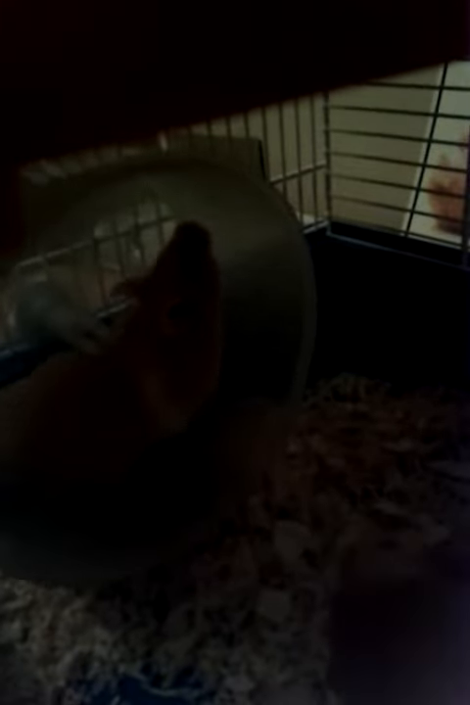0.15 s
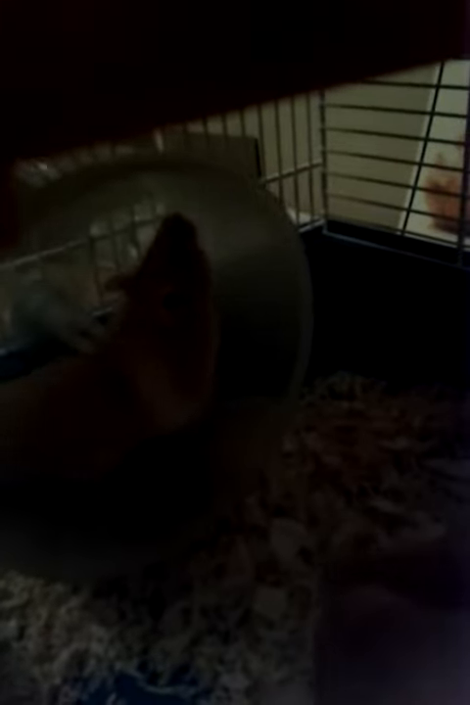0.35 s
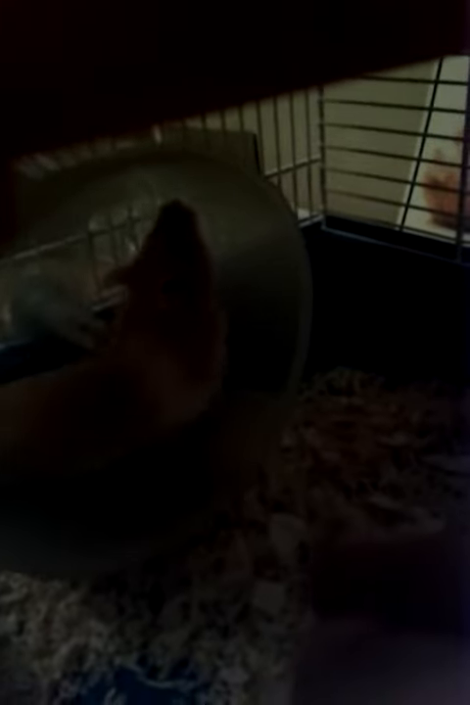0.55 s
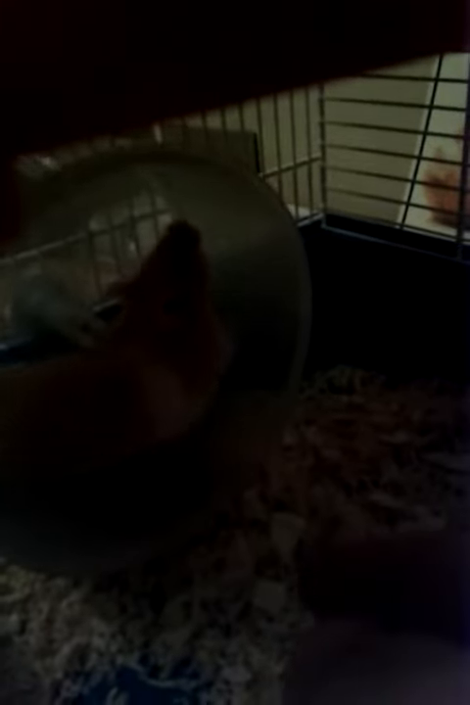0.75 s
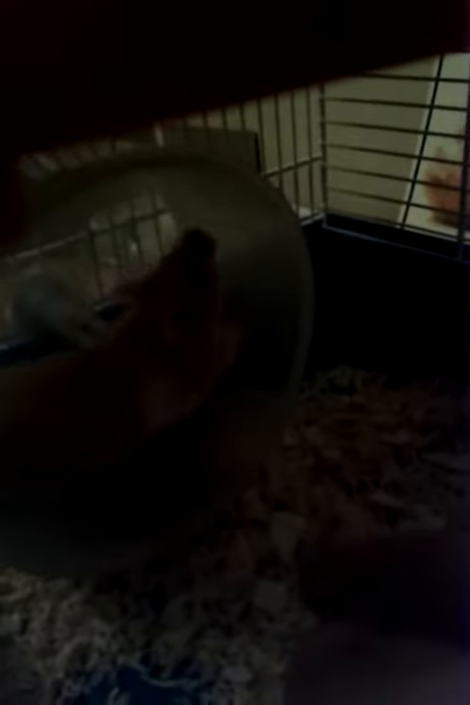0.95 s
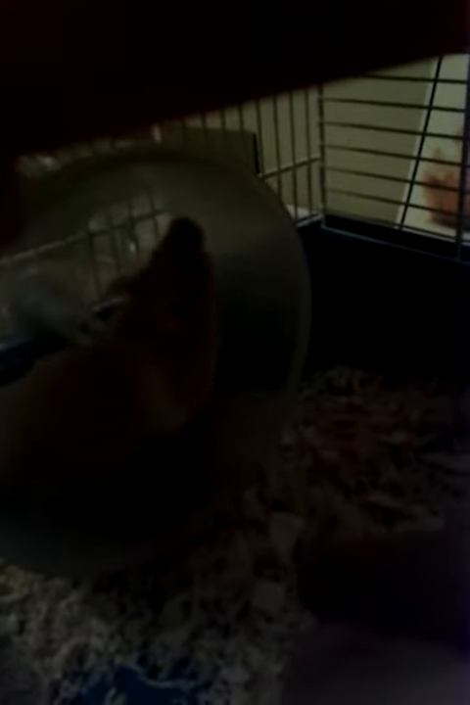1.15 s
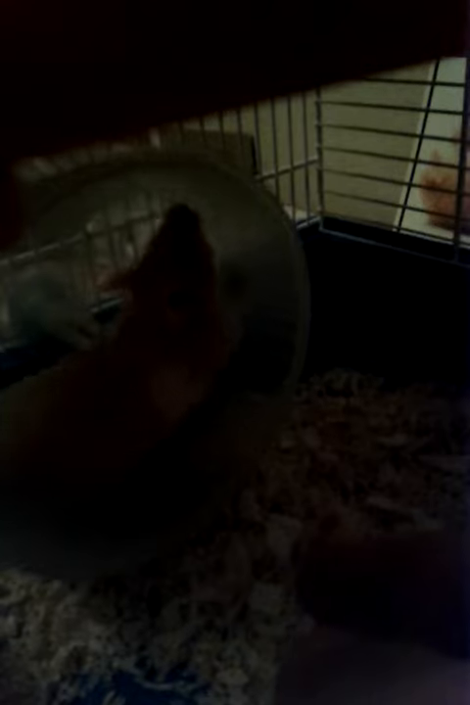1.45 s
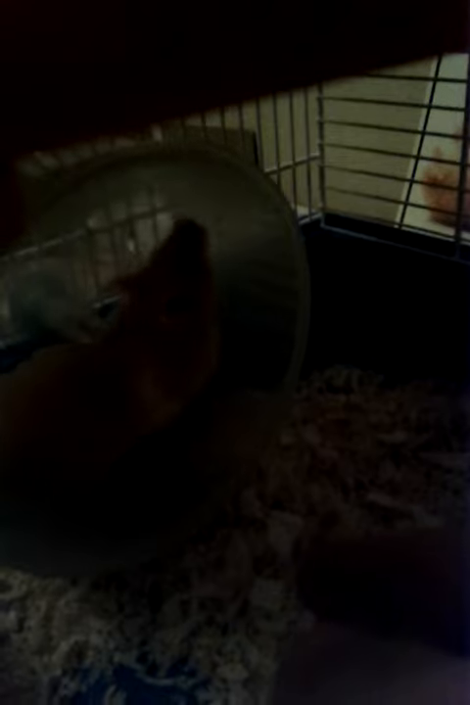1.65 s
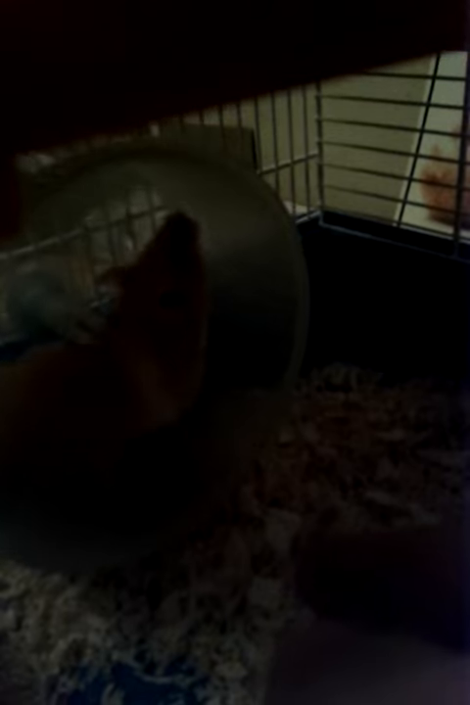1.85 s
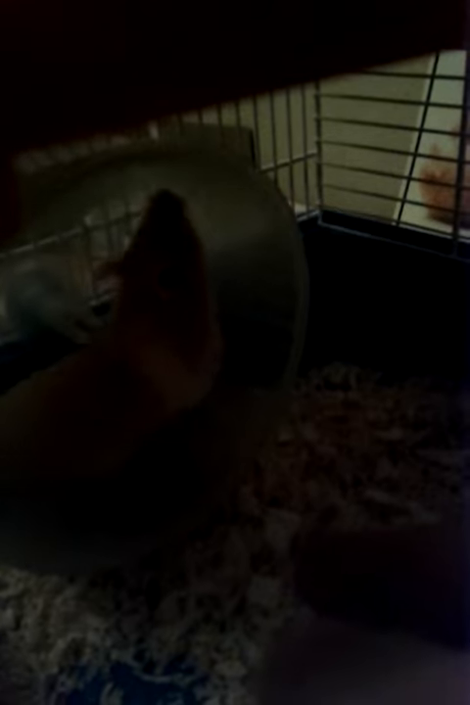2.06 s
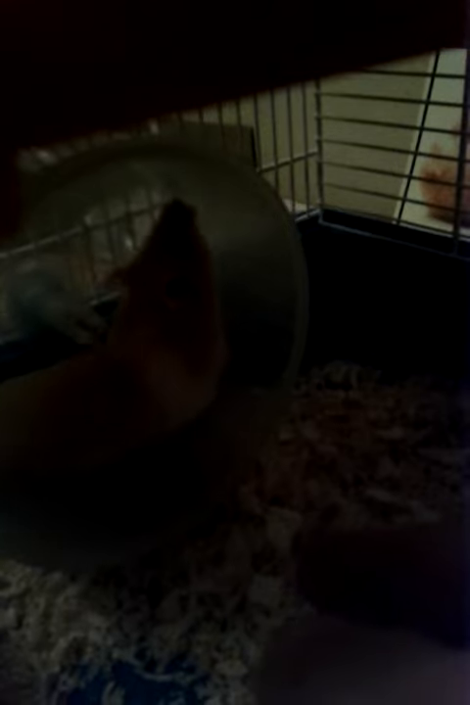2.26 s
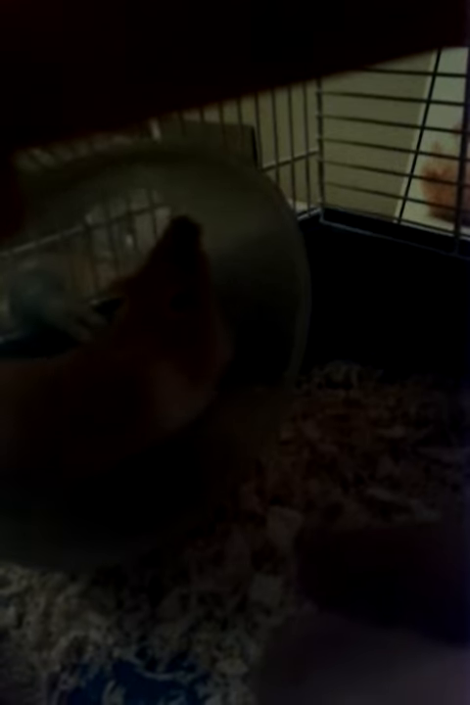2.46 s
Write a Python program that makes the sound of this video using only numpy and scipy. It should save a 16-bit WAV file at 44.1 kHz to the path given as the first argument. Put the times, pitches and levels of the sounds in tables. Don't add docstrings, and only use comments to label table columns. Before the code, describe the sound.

Close, narrow-band phone pickup of a rodent's wheel rattling in a wire cage: soft pats and ticks first, sharp knocks in the middle, a thin brief squeak, then the strongest clatter near the end.

```python
import sys
import numpy as np
from scipy import signal
from scipy.fft import rfft, irfft
from scipy.io import wavfile
from scipy.ndimage import uniform_filter1d, minimum_filter1d

SR = 44100
rng = np.random.default_rng(int(sys.argv[2]) if len(sys.argv) > 2 else 0)


def gain_from_decibels(decibels):
    exponent = np.asarray(decibels, float) / 20
    return 10 ** exponent


def generate_wav(sig):
    pcm = np.round(np.clip(np.atleast_2d(sig).T, -1, 1) * 32767).astype(np.int16)
    wavfile.write(sys.argv[1], SR, pcm)


N = 114660


def level(x, db):
    return x * gain_from_decibels(db) / np.sqrt(np.mean(x ** 2))


def colour(x, points):
    p = np.array(points)
    hz = np.maximum(np.fft.rfftfreq(len(x), 1 / SR), 1)
    gain_db = np.interp(np.log(hz), np.log(p[:, 0]), p[:, 1])
    return irfft(rfft(x) * gain_from_decibels(gain_db), len(x))


def ring(x, hz, t60_s):
    r = np.exp(-np.log(1000) / (t60_s * SR))
    w = 2 * np.pi * hz / SR
    return signal.lfilter([0, r * np.sin(w)], [1, -2 * r * np.cos(w), r * r], x)


def soften(x, hz, kind="low"):
    return signal.lfilter(*signal.butter(2, hz, kind, fs=SR), x)


def walk(rate_hz):
    k = int(SR / rate_hz)
    steps = np.repeat(rng.standard_normal(N // k + 1), k)
    return 1.5 * uniform_filter1d(uniform_filter1d(steps, k), k)[:N]


def grains(size, per_s):
    chance, strength = rng.random((2, size))
    return (chance < per_s / SR) * (2 * strength - 1)


def add(out, x, s, db):
    i = int(s * SR)
    out[i:i + len(x)] += (x * gain_from_decibels(db) / np.max(np.abs(x)))[:N - i]


# [f/Hz, density/dB per Hz]
ROOM = [(15, -68), (25, -25.5), (76, 4), (404, -20.5), (1140, -15.5), (1660, 0), (1870, -20.5),
        (2860, -11.5), (7000, -15), (9100, -65.5), (15400, -120)]
# [f/Hz, width/Hz, level/dB]
HUMS = [(1483, 74, -58), (1664, 220, -56.5), (913, 120, -59), (3400, 560, -62.5), (2170, 150, -64.5)]


def room():
    out = level(colour(rng.standard_normal(N), ROOM), -55)
    for hz, width_hz, db in HUMS:
        hum = ring(rng.standard_normal(N), hz, 2.22 / width_hz)
        out += level(hum, db) * gain_from_decibels(2.3 * walk(12.2))
    return out


# [t/s, f/Hz, level/dB]
SQUEAK = [
    (1.4, 6250, -69),
    (1.452, 5775, -65),
    (1.545, 5790, -66),
    (1.57, 5830, -74),
]


def squeak():
    t, (at_s, hz, db) = np.arange(N) / SR, np.transpose(SQUEAK)
    loud_db = np.interp(t, at_s, db, -120, -120) + 3 + 1.5 * walk(60)
    phase = 2 * np.pi * np.cumsum(np.interp(t, at_s, hz)) / SR
    return uniform_filter1d(gain_from_decibels(loud_db), 300) * np.sin(phase)


# [f/Hz, level/dB, t60/s]
WHEEL = [(181, -12.5, 0.16), (214.5, -9, 0.12), (262.4, -3, 0.091), (326.8, -6, 0.13), (401, -8, 0.21),
         (421.4, -2, 0.11), (556.4, -7, 0.12), (631.4, -8.5, 0.086), (778, -12, 0.044),
         (902.3, -10.5, 0.14), (1120, -12, 0.023), (1461, -9, 0.078), (1662, -8.5, 0.024),
         (2006, -26.5, 0.25)]


def wheel(push, bass_db, spot_db, detune, flip_every):
    out = np.zeros(len(push))
    for k, (hz, db, t60_s) in enumerate(WHEEL):
        mode_db = db + spot_db[k] + bass_db * (hz < 350)
        out += gain_from_decibels(mode_db) * (-1) ** (k // flip_every) * ring(push, hz * (1 + detune[k]), t60_s)
    return out


# [t/s, level/dB]
ROCKING = [(0, -48.5), (.35, -49.5), (.55, -48), (.8, -44), (.95, -45.5), (1.06, -37.5), (1.2, -43),
           (1.33, -39.5), (1.45, -44), (1.9, -49.5), (2.1, -41), (2.22, -44.5), (2.6, -49.5)]


def rocking():
    push = soften(grains(N, 540) * gain_from_decibels(2.9 * walk(29.98)), 720)
    still = np.zeros(len(WHEEL))
    body = wheel(push, 1.1, still, still, flip_every=1)
    bits = grains(N, 210) ** 3
    grit = 0.42 * ring(bits, 1500, 0.0098) + ring(bits, 4400, 0.0078)
    grit += 0.76 * ring(bits, 3300, 0.0058) + 0.68 * ring(bits, 5000, 0.0091)
    at_s, db = np.transpose(ROCKING)
    return (level(body, 0) + level(grit, -26.5)) * gain_from_decibels(np.interp(np.arange(N) / SR, at_s, db))


# [t/s, level/dB, f/Hz, scratch length/s]
TICKS = [(0.1096, -34, 2140, 0.0026), (0.1226, -40.5, 2040, 0.0018), (0.1855, -33.5, 3300, 0.0034),
         (0.2234, -28.5, 3760, 0.0025), (0.2653, -34.5, 2290, 0.0029), (0.3506, -37.5, 3210, 0.0051),
         (0.4155, -26, 6740, 0.0038), (0.4195, -34.5, 4000, 0.0017), (0.4688, -34.5, 3520, 0.0055),
         (0.5048, -35.5, 5500, 0.0025), (0.5841, -33.5, 2330, 0.0013), (0.7297, -34.5, 3070, 0.0015),
         (0.7567, -48, 2270, 0.002), (0.8185, -29, 2270, 0.0014), (0.8979, -36.5, 3400, 0.0018),
         (0.9098, -32.5, 3580, 0.0018), (0.9248, -31.5, 2370, 0.0015), (0.9502, -34.5, 3440, 0.002),
         (1.0802, -25.5, 4930, 0.0012), (1.1233, -33.5, 2960, 0.0011), (1.1902, -42, 2230, 0.0028),
         (1.2441, -45.5, 3840, 0.0049), (1.4646, -56, 2170, 0.002), (1.5504, -33, 2340, 0.002),
         (1.5783, -35.5, 3450, 0.002), (1.6591, -28.5, 2100, 0.0015), (1.6911, -26.5, 3760, 0.0024),
         (1.8203, -31.5, 3400, 0.001), (1.947, -38, 3480, 0.0032)]
# [t/s, level/dB, f/Hz, scratch length/s]
TICKS_LATE = [(0.698, -34.5, 3400, 0.0022), (1.703, -36, 3400, 0.002), (1.712, -42, 3320, 0.003),
              (1.731, -40.5, 3300, 0.002), (2.025, -43, 1700, 0.0032), (2.037, -34.5, 2080, 0.0038),
              (2.046, -28, 1510, 0.006), (2.083, -32, 2000, 0.004), (2.09, -36.5, 1580, 0.0036),
              (1.9145, -39.5, 3250, 0.0018), (2.1859, -37.5, 3220, 0.002), (2.2872, -36, 3500, 0.0015),
              (2.3316, -36, 2230, 0.0019), (2.363, -47, 2250, 0.0013), (2.4134, -32, 2150, 0.001),
              (2.5182, -35.5, 2550, 0.0037)]


def ticks():
    out, t = np.zeros(N), np.arange(SR // 25) / SR
    for s, db, hz, length_s in list(TICKS) + list(TICKS_LATE):
        length_s = max(length_s, .0004)
        fade = np.exp(-t / length_s) * np.minimum(3 * t / length_s, 1)
        scratch = soften(rng.standard_normal(len(t)), 1300, "high") * fade
        dull = soften(soften(scratch, 3.1 * hz), 1.3 * hz)
        wire = ring(scratch, hz, .007)
        add(out, level(dull, 0) + level(wire, -4), s, db - 2)
    return out


def blow(length_s, bass_db, soft_hz, first, rim_db):
    t, rattle_per_s = np.arange(SR // 5) / SR, 800
    rebound_fade = np.clip(3 - 3 * t / max(length_s, .002), 0, 1)
    push = gain_from_decibels(-11.5) * grains(len(t), rattle_per_s) * rebound_fade
    push[0] = first
    push = soften(push, soft_hz)
    scrape = grains(len(t), 4 * rattle_per_s) * np.exp(-t / max(0.46 * length_s, .002))
    scrape = soften(soften(soften(scrape, 810, "high"), 2250), 4500)

    spot = rng.standard_normal((len(WHEEL), 2))
    body = wheel(push, bass_db, 3.5 * spot[:, 0], 0.014 * spot[:, 1], flip_every=2)
    body += gain_from_decibels(-33 + bass_db) * ring(push, 95 * (1 + 0.14 * spot[0, 1]), 0.13)
    body += gain_from_decibels(rim_db) * ring(push, 427.4 * (1 + 0.014 * spot[1, 1]), 0.23)
    swell = np.minimum(0.52 + t / 0.0027, 1)
    damping_db = -16 * (1 - np.exp(-np.maximum(t - length_s, 0) / 0.0066))
    return level(body * swell * gain_from_decibels(damping_db), 0) + level(scrape, -20.5)


# [t/s, level/dB, bass/dB]
PATS_EARLY = [(0.115, -34.5, 4), (0.122, -28.5, 2.5), (0.133, -31, -13), (0.142, -36, -12),
              (0.154, -36, -15), (0.162, -37, 15.5), (0.244, -30, -3), (0.258, -36, 8), (0.267, -28.5, 1.5),
              (0.274, -30.5, 5), (0.424, -33, 0.5), (0.431, -29, -2), (0.442, -31, -4.5), (0.479, -28, -1),
              (0.487, -29, -2), (0.496, -39, -1), (0.505, -32.5, -10), (0.52, -30.5, -2.5),
              (0.527, -27.5, -2), (0.675, -23, 1), (0.704, -33.5, -9.5), (0.711, -26.5, 8),
              (0.724, -37, 13), (0.751, -33, 8.5), (0.759, -25.5, -1.5), (0.767, -27.5, -4.5),
              (0.791, -37.5, 13), (0.819, -31, -0.5), (0.836, -32.5, -1), (0.87, -29, -6),
              (0.877, -31, -2.5), (0.976, -29.5, 8.5), (0.989, -38, 8), (1.026, -20, 4.5),
              (1.043, -31.5, 0), (1.058, -32, -9.5), (1.072, -27.5, -8), (1.085, -24.5, -2.5),
              (1.092, -27.5, 3), (1.102, -36.5, 2.5), (1.125, -24.5, -8.5), (1.133, -23.5, -5),
              (1.14, -35.5, 10.5), (1.162, -32.5, 11), (1.169, -41, -3), (1.192, -31, 8), (1.206, -34.5, 0),
              (1.247, -27, -7), (1.255, -36.5, -0.5)]
# [t/s, level/dB, bass/dB]
PATS_LATE = [(1.283, -23.5, 5), (1.292, -31.5, 1), (1.299, -27.5, 7), (1.306, -32, 10), (1.318, -30.5, -5),
             (1.325, -36, 4), (1.332, -39, -5.5), (1.341, -28.5, 5), (1.36, -32, 9), (1.373, -37, 4),
             (1.384, -34, 10), (1.398, -35, 7), (1.486, -29.5, 0), (1.496, -30, -6), (1.557, -28, -7),
             (1.565, -28, 0.5), (1.588, -37.5, -4), (1.655, -28.5, 2.5), (1.663, -29, 4), (1.681, -29.5, 3),
             (1.728, -25.5, -5.5), (1.741, -27.5, 6.5), (1.75, -28.5, -4), (1.956, -38.5, 6.5),
             (1.987, -29.5, -14), (1.995, -26, -14), (2.027, -25, -2), (2.038, -17, -3),
             (2.054, -21.5, 2.5), (2.062, -28, 2), (2.083, -20.5, -4.5), (2.102, -23, 10),
             (2.147, -34.5, -1.5), (2.159, -32.5, 6), (2.172, -34.5, -1.5), (2.182, -30.5, 0.5),
             (2.19, -35, 13), (2.25, -29.5, 0.5), (2.257, -37.5, 1), (2.266, -36, 15), (2.274, -32.5, -1.5),
             (2.312, -33, -0.5), (2.343, -39, -12), (2.366, -26.5, 1), (2.373, -34, 10), (2.38, -27.5, 8.5),
             (2.391, -34.5, 1), (2.423, -26, 2), (2.43, -40.5, -6), (2.438, -30, 3), (2.463, -31, 4.5)]
# [t/s, level/dB, bass/dB]
PATS_MORE = [(.109, -33.5, -8.5), (.298, -32.5, -1), (.635, -36, 9), (1.551, -32, -8.5), (1.716, -25, 3),
             (1.791, -37.5, 7), (1.942, -36, -5), (2.09, -22.5, -9), (2.125, -22.5, -0.5), (2.305, -42, 4),
             (2.526, -37.5, -9)]


def pats():
    out = np.zeros(N)
    for s, db, bass_db in list(PATS_EARLY) + list(PATS_LATE) + list(PATS_MORE):
        add(out, blow(0.0062, bass_db, soft_hz=1130, first=.8, rim_db=-12.5), s, db + 0.97)
    return out


# [t/s, level/dB, rattle length/s, crack/dB, bass/dB]
KNOCKS = [
    (.661, -24, 0.015, -13, -2.5),
    (0.69, -24, 0.013, -11, 2.5),
    (1.011, -16.5, 0.012, 0, -17.5),
    (1.266, -20, 0.018, -1, -7.5),
    (2.011, -18, 0.016, -1.5, -1.5),
    (2.07, -15, 0.014, -5, -0.5),
    (2.117, -25, 0.011, -2.5, -7),
    (2.234, -22, 0.013, -11, -6.5),
]
# [f/Hz, density/dB per Hz]
CRACK = [(530, -8), (900, -2), (1830, -5.5), (2500, -12.5), (4720, -15), (7000, -32), (9100, -68),
         (15400, -120)]


def knocks():
    out, t = np.zeros(N), np.arange(SR // 10) / SR
    fade = np.exp(-t / 0.003) + gain_from_decibels(-21) * np.exp(-t / 0.028)
    for s, db, length_s, crack_db, bass_db in KNOCKS:
        add(out, blow(length_s, bass_db, soft_hz=2500, first=6.4, rim_db=-2), s, db + 3.5)
        crack = fade * soften(colour(rng.standard_normal(len(t)), CRACK), 970, "high")
        add(out, crack, s - .001, db + crack_db)
    return out


def echo(near):
    t, t60_s = np.arange(SR // 3) / SR, .25
    tail = soften(rng.standard_normal(len(t)), 3200) * np.exp(-np.log(1000) * t / t60_s)
    tail *= t > .004
    return signal.fftconvolve(near, gain_from_decibels(-14) * tail / np.sqrt(np.sum(tail ** 2)))[:N]


def scene():
    near = knocks() + pats() + ticks() + rocking()
    return (near + echo(near) + squeak() + room())[None]


def thin_treble(x):
    hz, _, z = signal.stft(x, SR, nperseg=512)
    power = np.abs(z) ** 2
    loud = -minimum_filter1d(-power.sum(axis=0), size=11)
    bands = np.repeat(uniform_filter1d(power, size=4, axis=0)[::4], 4, axis=0)[:len(hz)]
    patches = np.kron(rng.standard_normal((33, len(loud) // 3 + 1)), np.ones((8, 3)))
    mask_db = -58.5 + 5 * patches[:len(hz), :len(loud)]
    keep = (bands > gain_from_decibels(2 * mask_db) * loud) | (hz[:, None] < 2500)
    return signal.istft(z * keep, SR, nperseg=512)[1][:N]


def low_pass(x):
    return signal.sosfilt(signal.butter(12, 7680, fs=SR, output="sos"), x)


def record(dry):
    thinned = thin_treble(soften(dry[0], 70, "high"))
    voice_band = signal.ellip(12, .3, 90, 6900, fs=SR, output="sos")
    mix = signal.sosfilt(voice_band, thinned[None]) + gain_from_decibels(-102) * rng.standard_normal(dry.shape)
    return low_pass(mix)


dry = scene()
out = record(dry)
generate_wav(out)
```